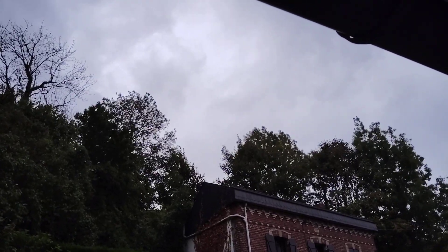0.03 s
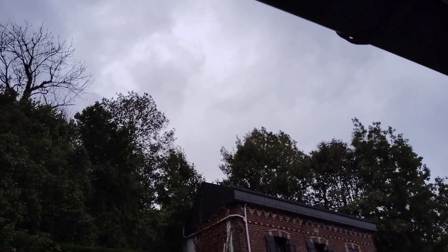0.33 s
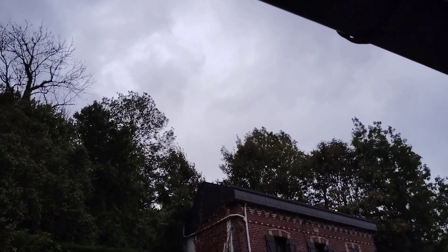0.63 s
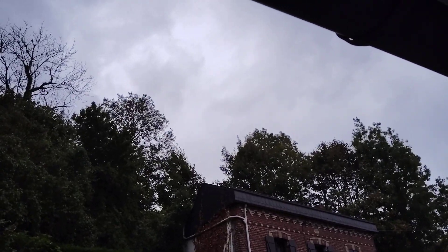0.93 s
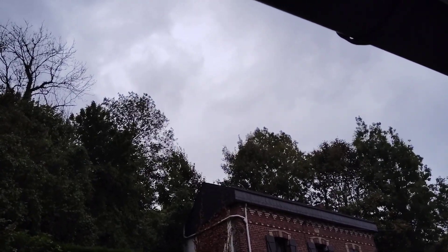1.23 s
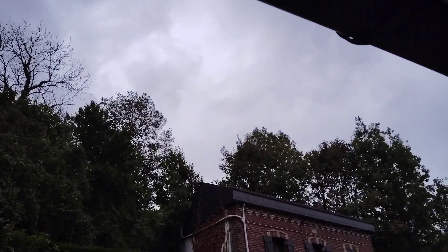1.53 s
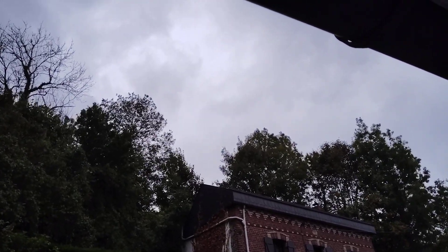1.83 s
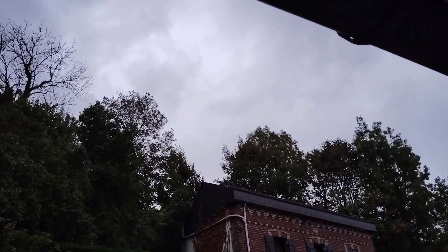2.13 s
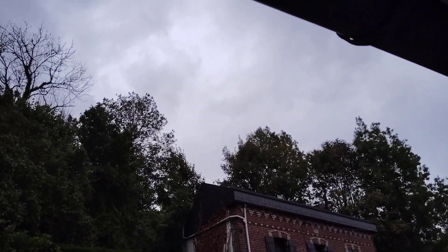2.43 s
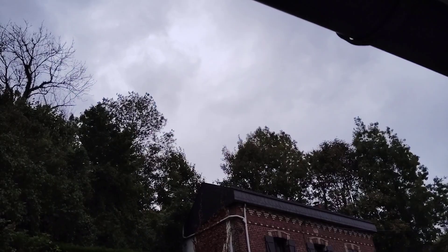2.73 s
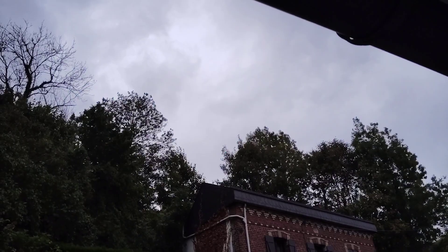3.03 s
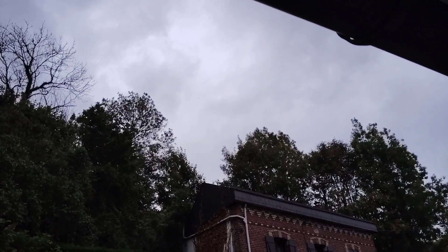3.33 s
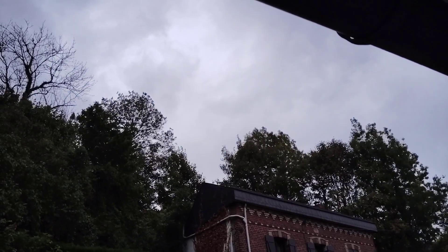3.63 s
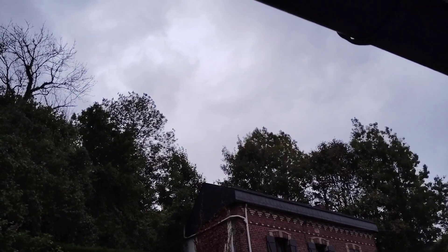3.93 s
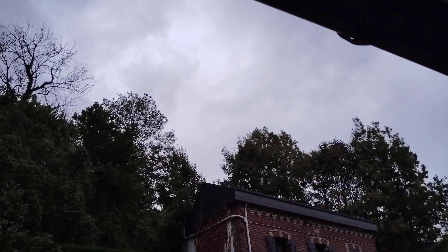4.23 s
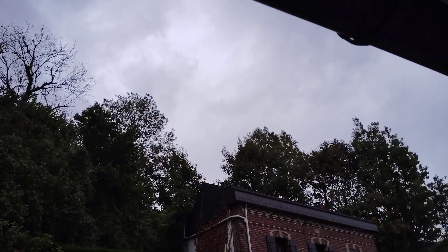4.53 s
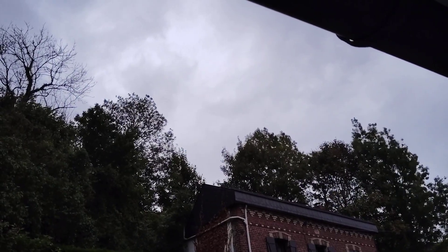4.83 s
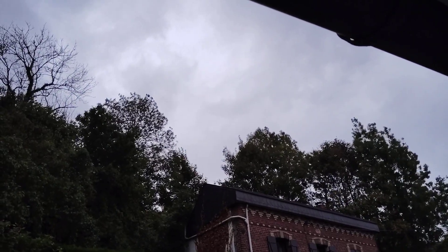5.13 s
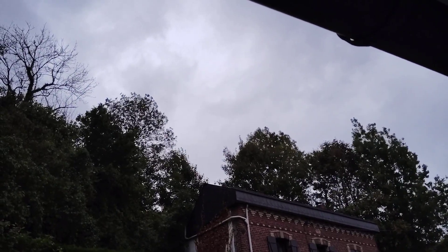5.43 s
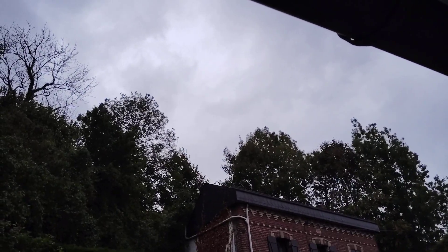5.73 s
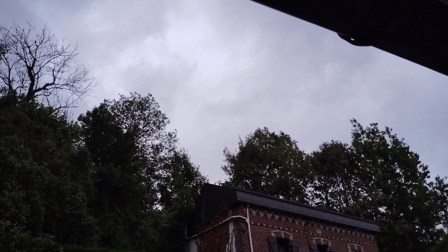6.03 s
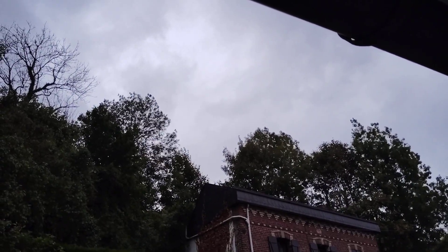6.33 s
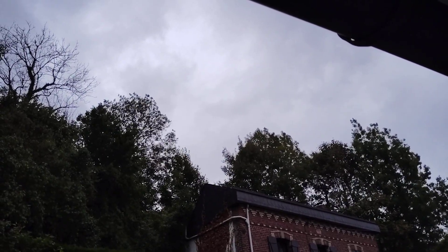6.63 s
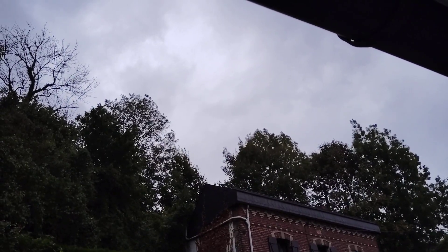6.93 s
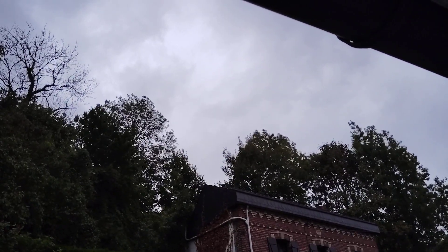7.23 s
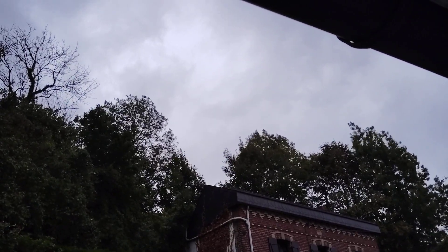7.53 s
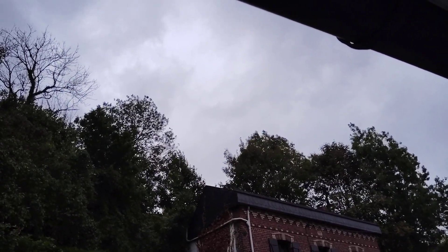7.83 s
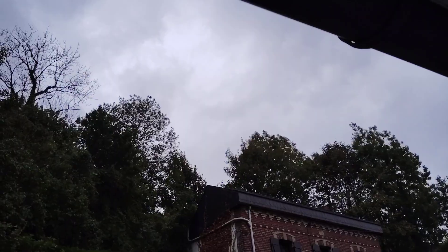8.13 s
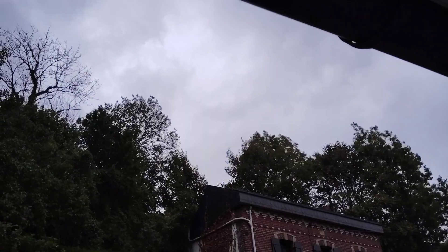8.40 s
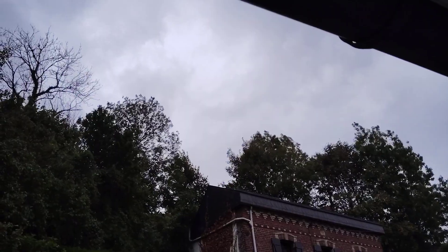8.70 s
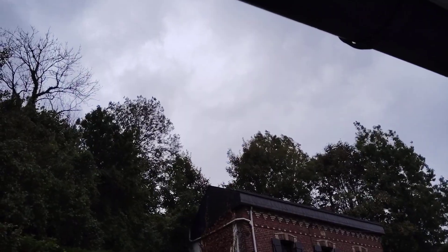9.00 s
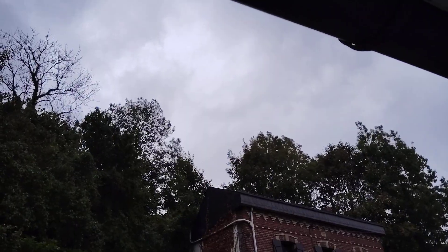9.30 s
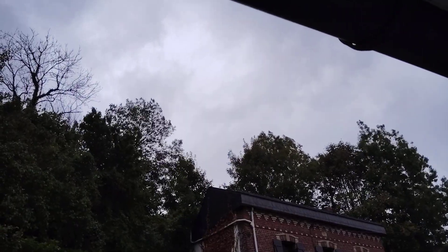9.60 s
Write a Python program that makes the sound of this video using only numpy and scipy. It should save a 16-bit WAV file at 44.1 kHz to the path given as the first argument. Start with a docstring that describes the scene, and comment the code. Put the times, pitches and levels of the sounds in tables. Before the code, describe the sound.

Wind blows through tall trees beside a house, with leaves softly hissing and ticking over a low rumble of open air. Through the first half, loud gusts hit the microphone in lumpy rumbles and short slaps. They then die away, and the roar of distant treetops slowly swells. Near the end comes a faint, brief whistle.

```python
"""Under the eaves of a house, tall trees behind it in wind. Leaves hiss and tick; the roar of far crowns slowly
swells over a low rumble of open air. In the first half, gusts buffet the microphone: lumpy rumbles that rise
fast, hold and die away. Single eddies slap it, and the hardest make the limiter duck everything for a moment.
Near the end, a faint, brief whistle."""
import sys
import numpy as np
from scipy import signal
from scipy.fft import rfft, irfft, next_fast_len
from scipy.io import wavfile
from scipy.ndimage import uniform_filter1d, minimum_filter1d

SR = 44100
rng = np.random.default_rng(int(sys.argv[2]) if len(sys.argv) > 2 else 0)


def waveform_to_disk(signal):
    """Save audio, clipped to [-1, 1], as 16-bit WAV at the path in sys.argv[1]."""
    frames = np.transpose(np.atleast_2d(signal))
    scaled = np.clip(frames, -1, 1) * 32767
    samples = np.round(scaled).astype(np.int16)
    wavfile.write(sys.argv[1], SR, samples)


N = 430416
TIME_S = np.arange(N) / SR

# wind in the trees, before trim: t/s, roar level/dB, leaf level/dB
TREE_WIND = [(0, -53, -53), (2.4, -52, -52.5), (4.3, -51.5, -51.5), (5.5, -48.5, -51.5),
             (7.5, -46.5, -52.5), (9.76, -46, -53.5)]
# far crowns: f/Hz, level/dB
ROAR_SPECTRUM = [(150, -14.5), (480, -6.5), (620, -2.5), (740, 0), (900, 1.5), (1060, 0), (1250, -6),
                 (1400, -6), (1600, -3), (1950, -10), (2400, -9.5), (4000, -24.5), (8000, -34)]
# leaves: f/Hz, level/dB
LEAF_SPECTRUM = [(300, -1.5), (700, -0.5), (1300, -1), (2400, 0), (3500, -2.5), (5000, -7.5), (7000, -11),
                 (9000, -10), (11000, -13.5), (13300, -19.5), (15700, -26)]
# open air: f/Hz, level/dB
AIR_SPECTRUM = [(20, -16), (40, -29), (75, -17.5), (105, -1.5), (130, 2), (150, -3.5), (175, 3.5),
                (212, -3), (248, 0.5), (330, -7.5), (450, -11.5), (800, -21.5)]
# draught over the microphone: t/s, level/dB
DRAUGHT_LEVEL = [(0, -76), (4.8, -70), (5.4, -87), (9.05, -87), (9.13, -59), (9.3, -64), (9.76, -62)]
# gusts on the microphone: t/s, hold/s, force/dB
GUSTS = [(0.678, .05, -38), (0.786, 0.088, -19.5), (0.894, 0.011, -20.5), (0.982, 0.032, -24),
         (1.042, 0.057, -18.5), (1.364, 0.02, -15.5), (1.444, 0.032, -18), (1.508, 0.016, -30.5),
         (1.781, 0.013, -31.5), (1.852, 0.025, -29), (2.226, .028, -27), (2.3, 0.015, -24),
         (2.502, 0.1, -18), (2.682, 0.17, -22), (2.865, 0.03, -20.5), (2.932, 0.19, -30),
         (3.167, 0.076, -21.5), (3.241, 0.049, -24.5), (3.428, 0.043, -25.5), (3.517, 0.15, -33),
         (3.742, 0.048, -20), (3.799, 0.037, -19), (3.865, 0.049, -19), (3.975, 0.049, -31),
         (4.259, 0.13, -45), (4.545, 0.017, -28.5), (4.6, 0.039, -28), (4.712, 0.081, -38)]
# gust turbulence: f/Hz, level/dB
EDDY_SPECTRUM = [(100, 1.5), (115, 1.5), (140, -2), (200, -2.5), (270, -5), (330, -22.5), (450, -30.5),
                 (900, -21)]
# single eddies on the microphone: t/s, level/dB, initial f/Hz, rise/s
EDDY_PUFFS = [(0.849, -3, 233, 0.0023), (1.332, -15.5, 197, 0.0055), (1.391, -11.5, 194, 0.0068),
              (1.437, -15, 208, 0.0032), (2.203, -20, 160, 0.0038), (2.44, -11.5, 194, .0055),
              (2.474, -1, 206.5, 0.0089), (2.480, -14, 520, 0.0026), (2.553, -15, 206, .0035),
              (2.833, -11, 200, .004), (2.932, -12, 166, 0.0053), (3.048, -12.5, 184, 0.0043),
              (3.181, -13, 192, 0.0061), (3.647, -10.5, 170, 0.0045), (3.829, -9, 220, 0.0039),
              (4.006, -17, 145, 0.0059), (4.597, -21, 169, 0.0043), (4.662, -21.5, 152, 0.0043),
              (4.765, -25.5, 150, .0049)]


def from_db(db):
    """Decibels to gain."""
    return 10 ** (np.asarray(db) / 20)


def unit_rms(x):
    """Scale to rms 1."""
    return x / np.sqrt(np.mean(x ** 2) + 1e-20)


def curves(rows):
    """Table columns interpolated per sample."""
    t_s, *columns = np.transpose(rows)
    return [np.interp(TIME_S, t_s, column) for column in columns]


def gain_at(spectrum, hz):
    """Spectrum gain, interpolated over log frequency."""
    points_hz, db = np.transpose(spectrum)
    return from_db(np.interp(np.log(hz + 1), np.log(points_hz), db))


def coloured(noise, spectrum):
    """Noise shaped by a spectrum; rms 1."""
    size = next_fast_len(N)
    hz = np.arange(size // 2 + 1) * SR / size
    return unit_rms(irfft(rfft(noise, size) * gain_at(spectrum, hz), size)[:N])


def drift(rate_hz):
    """Smooth random curve; rms 1."""
    step, settle = 40, 2000
    pole = np.exp(-2 * np.pi * rate_hz * step / SR)
    white = rng.standard_normal(N // step + settle + 2)
    slow = signal.lfilter([1], [1, -2 * pole, pole * pole], white)[settle:]
    return np.interp(np.arange(N) / step, np.arange(len(slow)), unit_rms(slow))


def low_noise(cutoff_hz):
    """Low-passed noise; rms 1."""
    return unit_rms(signal.lfilter(*signal.butter(2, cutoff_hz, fs=SR), rng.standard_normal(N)))


def noise_bands(low_hz, high_hz, count):
    """Adjoining noise bands, neighbours uncorrelated; yields centre/Hz, band."""
    edges_hz = np.geomspace(low_hz, high_hz, count + 1)
    white = rng.standard_normal((2, N))
    for k, (low, high) in enumerate(zip(edges_hz, edges_hz[1:])):
        bandpass = signal.butter(2, [low, high], "band", fs=SR, output="sos")
        yield np.sqrt(low * high), signal.sosfilt(bandpass, white[k % 2])


def swaying_noise(depth_db, rate_hz):
    """Bands swell and sink independently as branches sway."""
    return sum(band * from_db(depth_db * drift(rate_hz)) for _, band in noise_bands(150, 18000, 11))


def treetops(level_db, trim_db):
    """Far crowns give a smooth, hollow roar."""
    sway = swaying_noise(depth_db=0.35, rate_hz=6)
    return from_db(level_db + trim_db) * coloured(sway, ROAR_SPECTRUM)


def foliage(level_db, trim_db, base_ticks_per_s, tick_db):
    """Countless leaves merge into hiss; near ones tick in flurries, more often in stronger wind."""
    ticks_per_s = base_ticks_per_s * from_db(2 * (level_db - level_db.mean()) + 2.5 * drift(16))
    sizes = from_db(3.6 * np.minimum(rng.exponential(1, N), 4)) * rng.choice([-1, 1], N)
    ticks = unit_rms(sizes * (rng.random(N) < ticks_per_s / SR))
    hiss = unit_rms(swaying_noise(depth_db=0.5, rate_hz=24)) * from_db(0.25 * drift(22))
    return from_db(level_db + trim_db) * coloured(hiss + from_db(tick_db) * ticks, LEAF_SPECTRUM)


def open_air(roar_db, max_db):
    """Low rumble that grows a little with the wind."""
    swell_db = 0.28 * (roar_db - roar_db.max())
    return from_db(max_db + swell_db) * coloured(low_noise(cutoff_hz=900), AIR_SPECTRUM)


def flutter(level_db):
    """Slow pressure swings shake the microphone."""
    return from_db(level_db) * low_noise(cutoff_hz=85)


def gust_force_db(attack_db_per_s=800, release_db_per_s=520, stir_db=-11.5, stir_db_per_s=156):
    """Each gust rises, holds and dies inside a wider patch of weakly stirred air."""
    force_db = np.full(N, -90.0)
    for start_s, hold_s, level_db in GUSTS:
        before_s = np.maximum(start_s - TIME_S, 0)
        after_s = np.maximum(TIME_S - start_s - hold_s, 0)
        core_db = -attack_db_per_s * before_s - release_db_per_s * after_s
        patch_db = stir_db - stir_db_per_s * (before_s + after_s)
        force_db = np.maximum(force_db, level_db + np.maximum(core_db, patch_db))
    return force_db


def turbulence(force_db, base_corner_hz, force_db_per_octave, lump_db):
    """Faster air is louder and carries smaller eddies, so its rumble reaches higher."""
    corner_hz = base_corner_hz * 2 ** ((force_db + 20) / force_db_per_octave)
    flow = sum(band * gain_at(EDDY_SPECTRUM, hz) / (1 + (hz / corner_hz) ** 5)
               for hz, band in noise_bands(90, 900, 10))
    flow = signal.sosfilt(signal.butter(4, 540, fs=SR, output="sos"), flow)
    mic_low_cut = signal.cheby1(6, 0.5, 102, "high", fs=SR, output="sos")
    flow = signal.sosfilt(mic_low_cut, flow + 1e-18)
    # flatten first: force sets the level, eddies add lumps
    span = SR // 70
    envelope = np.sqrt(uniform_filter1d(uniform_filter1d(flow ** 2, span), span) + 1e-12)
    return flow / envelope * from_db(force_db + lump_db * np.tanh(drift(22.8)))


def buffeting(overload, flutter_db):
    """Gusts on the microphone, largest swings rounded off, plus puffs and deep flutter."""
    force_db = gust_force_db()
    pressure = turbulence(force_db, base_corner_hz=278, force_db_per_octave=17.5, lump_db=5.5)
    pressure /= (1 + (pressure / overload) ** 4) ** 0.25
    pressure += sum(puff(*row) for row in EDDY_PUFFS)
    pressure = signal.sosfilt(signal.butter(4, 84, "high", fs=SR, output="sos"), pressure)
    # some flutter gets past the low cut
    return pressure + (force_db > -80) * flutter(flutter_db + 0.5 * force_db)


def puff(start_s, level_db, initial_hz, rise_s):
    """One eddy swings the pressure a few times, slowing as it dies; the harder, the more lopsided."""
    age = np.arange(SR // 20) / SR / rise_s
    cycles = initial_hz * rise_s * (age - 0.056 * age ** 2)
    envelope = (age * np.exp(1 - age)) ** 2
    swing = envelope * np.sin(2 * np.pi * (cycles + rng.random()))
    skew = 0.16 * from_db(level_db)
    wave = from_db(level_db) * (swing + skew * swing ** 2 + skew ** 2 * swing ** 3)
    return np.concatenate([np.zeros(int(start_s * SR)), wave, np.zeros(N)])[:N]


def limiter(x, ceiling_db, hold_s, release_s):
    """Gain drops just ahead of a peak over the ceiling, holds, then recovers."""
    needed_gain = np.minimum(1, from_db(ceiling_db) / (np.abs(x) + 1e-9))
    hold, attack = int(hold_s * SR), SR // 250
    cut = 1 - minimum_filter1d(needed_gain, hold, origin=(hold - attack) // 2)
    recovery = TIME_S / release_s
    cut = np.maximum.accumulate(cut + recovery) - recovery
    return x * (1 - uniform_filter1d(cut, attack))


def whistle(centre_s, pitch_hz, peak_db, half_width_s):
    """A far, unsteady note comes and goes in the roar."""
    phase = 2 * np.pi * np.cumsum(pitch_hz * (1 + 0.012 * drift(26))) / SR
    envelope = np.exp(-((TIME_S - centre_s) / half_width_s) ** 2)
    return from_db(peak_db) * envelope * np.sin(phase)


def scene():
    """Trees and open air, with draught and gusts right on the microphone; mono."""
    roar_db, leaf_db = curves(TREE_WIND)
    draught_db, = curves(DRAUGHT_LEVEL)
    mix = treetops(roar_db, trim_db=-2)
    mix += foliage(leaf_db, trim_db=2, base_ticks_per_s=1500, tick_db=-7.5)
    mix += whistle(centre_s=9.527, pitch_hz=1160, peak_db=-45, half_width_s=0.032)
    mix += open_air(roar_db, max_db=-48.5)
    mix += flutter(draught_db)
    mix += buffeting(overload=0.41, flutter_db=-31)
    return mix[None]


def record(dry):
    """Microphone port resonance, limiter, steep top cut."""
    port_hz, port_width_hz, port_db = 9020, 1500, 7
    top_hz = 15720
    ring = signal.lfilter(*signal.iirpeak(port_hz, port_hz / port_width_hz, fs=SR), dry[0])
    mic = dry[0] + (from_db(port_db) - 1) * ring
    limited = limiter(mic, ceiling_db=-6.2, hold_s=0.095, release_s=0.04)
    return signal.sosfilt(signal.ellip(12, 0.1, 80, top_hz, fs=SR, output="sos"), limited)[None]


dry = scene()
out = record(dry)
waveform_to_disk(out)
```